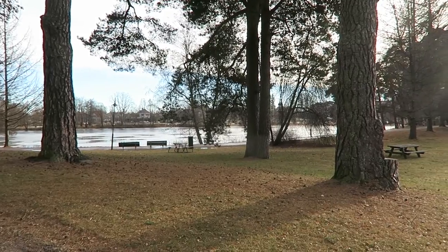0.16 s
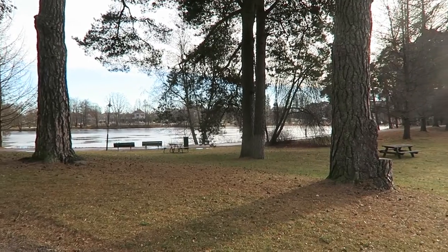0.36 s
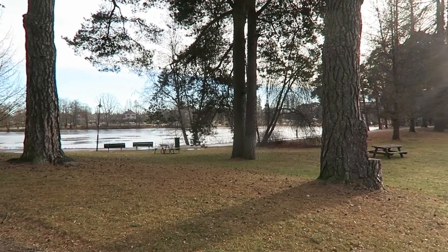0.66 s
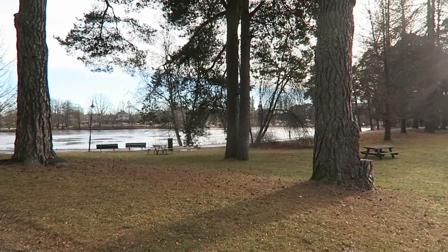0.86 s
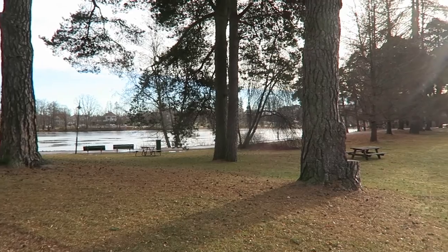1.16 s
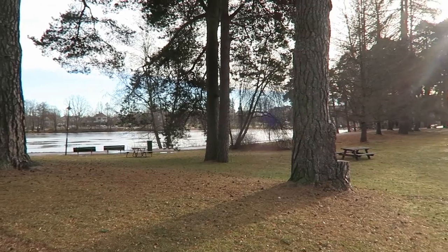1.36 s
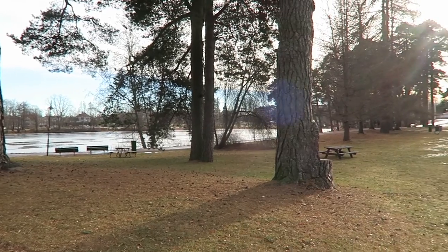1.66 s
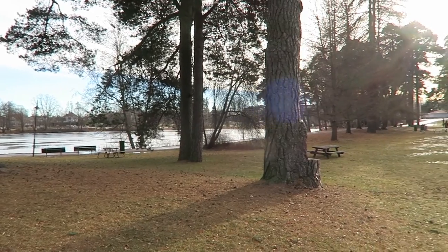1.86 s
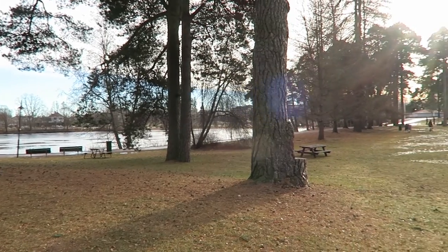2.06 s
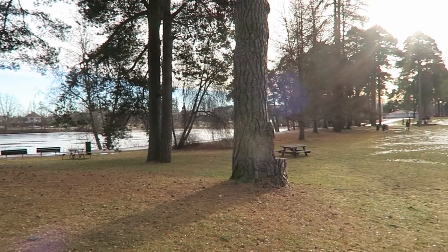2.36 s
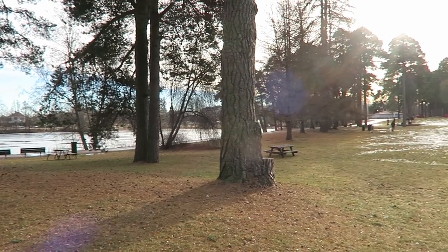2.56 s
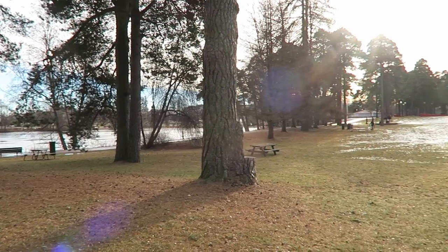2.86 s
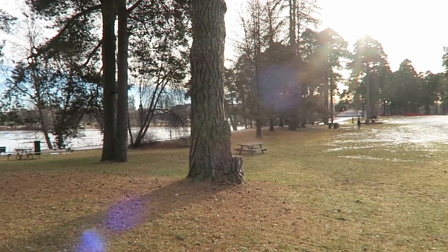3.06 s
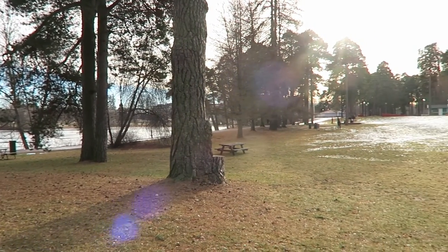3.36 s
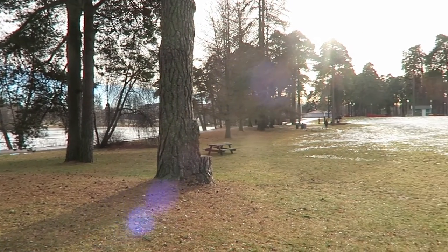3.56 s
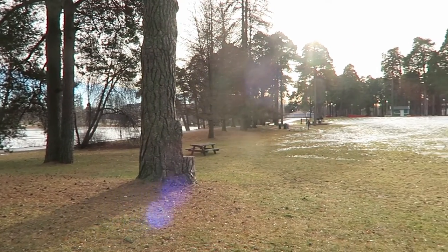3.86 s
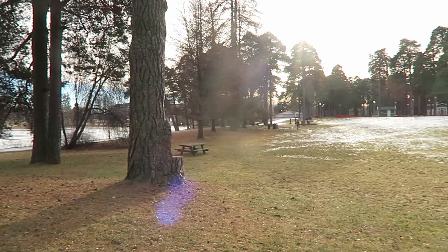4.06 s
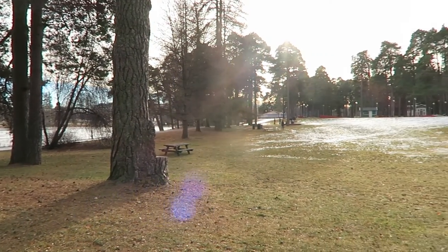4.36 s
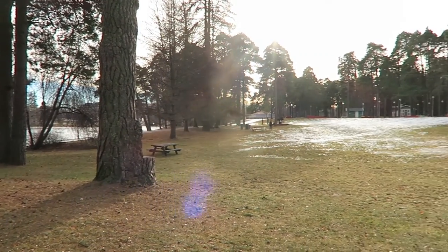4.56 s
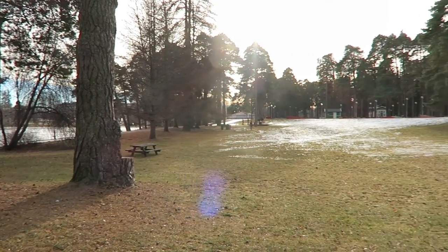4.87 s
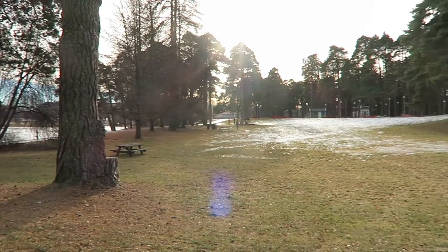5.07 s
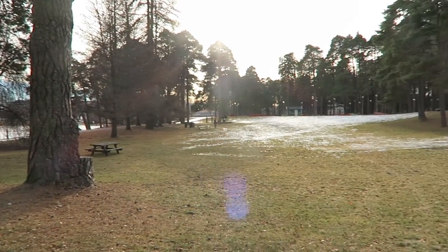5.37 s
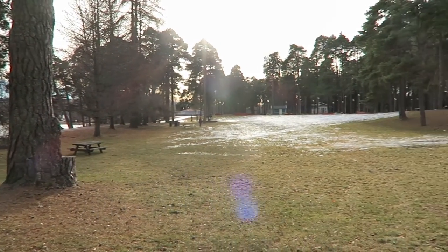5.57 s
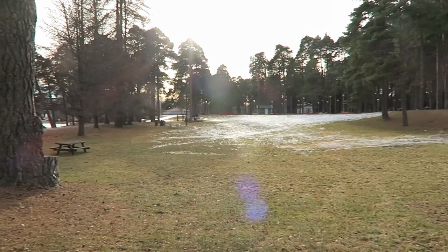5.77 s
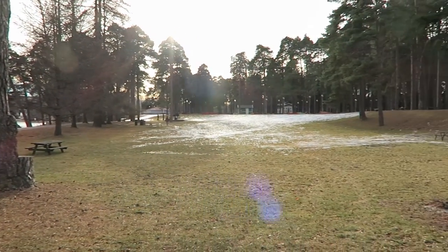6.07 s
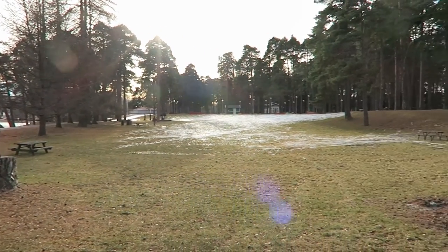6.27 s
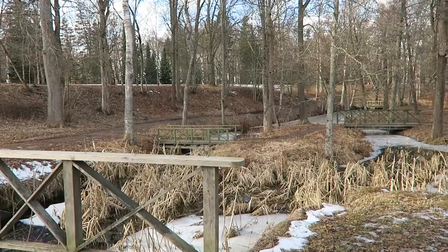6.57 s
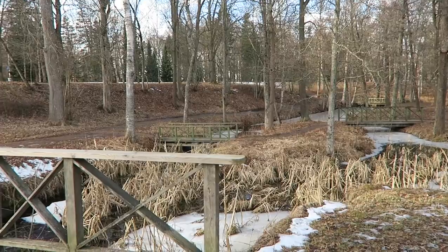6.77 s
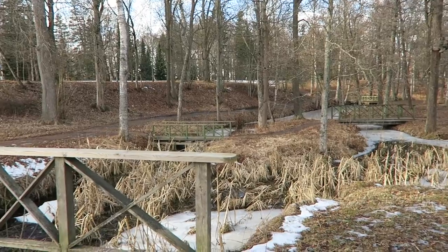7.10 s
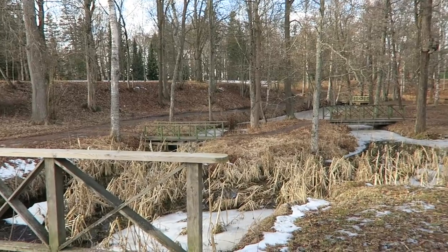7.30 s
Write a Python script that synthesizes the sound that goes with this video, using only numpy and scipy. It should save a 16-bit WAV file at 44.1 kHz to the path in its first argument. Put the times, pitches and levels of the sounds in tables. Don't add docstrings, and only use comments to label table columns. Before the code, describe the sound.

Steady distant road roar with swelling low rumble, faint birdsong and tiny clicks, then an abrupt cut to a rushing brook hit by buffeting wind.

```python
import sys
import numpy as np
from scipy import signal
from scipy.fft import rfft, irfft, next_fast_len
from scipy.io import wavfile
from scipy.ndimage import uniform_filter1d

SR = 44100
rng = np.random.default_rng(int(sys.argv[2]) if len(sys.argv) > 2 else 0)


def ratio(d):
    e = np.asarray(d, float) / 20
    return 10 ** e


def inscribe(sig):
    pcm = np.round(np.clip(np.atleast_2d(sig).T, -1, 1) * 32767)
    wavfile.write(sys.argv[1], SR, pcm.astype(np.int16))


N = 327944
CHANGE_S, WIND_FILTER_S = 6.632, 7.252


def curves(table):
    s, *columns = np.transpose(table)
    return [np.interp(np.arange(N) / SR, s, c) for c in columns]


def after(seconds, fade_s=0.0033):
    return np.clip((np.arange(N) / SR - seconds) / fade_s, 0, 1)


def walk(rate_hz):
    k = int(SR / rate_hz)
    held = np.repeat(rng.standard_normal(N // k + 1), k)
    return 1.3 * uniform_filter1d(uniform_filter1d(held, k), k)[:N]


def bumps(table):
    t = np.arange(N) / SR
    return sum(ratio(db) * np.exp(-((t - s) / length) ** 2 * 4) for s, length, db in table)


def band(x, lo_hz, hi_hz, order=2):
    return signal.sosfilt(signal.butter(order, [lo_hz, hi_hz], "bandpass", fs=SR, output="sos"), x)


def even(x, seconds):
    k = int(seconds * SR)
    return x / np.sqrt(uniform_filter1d(uniform_filter1d(x ** 2, k), k) + 1e-12)


def ports(mid, side):
    return np.array([mid + side, mid - side])


def along(table, hz):
    table_hz, value = np.transpose(table)
    return np.interp(np.log(hz), np.log(table_hz), value)


def wash(mid_spectrum, side_spectrum, lean, lo_hz, hi_hz):
    size = next_fast_len(N)
    hz = np.arange(size // 2 + 1) * SR / size + 1e-3
    mid, own = rfft(rng.standard_normal((2, size)))
    share = np.clip(along(lean, hz), -.95, .95)
    bins = np.array([mid, 1j * share * mid + np.sqrt(1 - share ** 2) * own])
    bins *= ratio([along(mid_spectrum, hz), along(side_spectrum, hz)])
    inside = (hz > lo_hz) & (hz < hi_hz)
    power = 2 * np.sum(np.abs(bins[:, inside]) ** 2, axis=1, keepdims=True)
    return irfft(bins, size)[:, :N] * size / np.sqrt(power)


def treble_flicker(x):
    out = x.copy()
    for lo_hz, hi_hz in [(3000, 4500), (4500, 6500), (6500, 8500), (8500, 11000), (11000, 14500)]:
        out += band(x, lo_hz, hi_hz) * (ratio(1.6 * walk(24)) - 1)
    return out


# time in seconds, level in dB.
RUMBLE = [(0.0, -41), (.15, -33.5), (.45, -38.5), (.8, -32.5), (1.0, -36), (1.45, -32), (1.75, -35.5),
          (2.4, -33.5), (2.6, -34), (3.1, -36.5), (3.45, -30), (3.7, -35), (4.1, -34), (4.9, -36),
          (5.5, -32.5), (5.7, -32.5), (6.25, -35), (6.62, -32)]
# frequency in Hz, density in dB per Hz.
ROAD_MID = [(12, -56), (20, -19), (32, -10.5), (47, 1.5), (60, 0), (198, -10), (227, -12.5), (384, -19.5),
            (615, -18), (767, -16), (1040, -17), (1300, -24), (2730, -44), (11800, -69), (14700, -76)]
ROAD_SIDE = [(35, -49), (60, -26), (81, -15), (154, -5), (274, -3), (362, -4), (425, -2.5), (466, -5),
             (1090, -10), (5870, -35), (8100, -36.5), (14700, -51)]
# frequency in Hz, share of side following mid (-1..1).
ROAD_LEAN = [(200, -0.13), (520, -0.47), (2200, -.2), (3300, 0.27), (4200, 0.9), (5500, .3), (8000, .05)]


def road():
    roar_db, side_db, rumble_top_hz = -38.5, -50.5, 152
    rumble_db = curves(RUMBLE)[0] + 1.37 * walk(11)
    mid, side = wash(ROAD_MID, ROAD_SIDE, ROAD_LEAN, 400, 1600)
    rumble = signal.sosfiltfilt(signal.butter(2, rumble_top_hz, fs=SR, output="sos"), mid)
    roar = (mid - rumble) * ratio(roar_db + .5 * walk(12))
    mid = even(rumble, 0.29) * ratio(rumble_db) + roar
    return treble_flicker(ports(mid, side * ratio(side_db)))


# time in seconds, peak in dB.
PUFFS = [(.37, -44), (.7, -37), (.87, -46), (1.09, -53), (1.35, -37), (1.5, -42), (1.66, -44), (1.8, -51),
         (1.95, -53), (2.38, -37), (2.6, -55), (2.75, -51), (2.89, -54), (3.31, -45), (3.45, -41),
         (3.58, -48), (5.15, -48), (5.49, -37), (5.83, -38), (5.97, -42), (6.08, -37), (6.34, -41),
         (6.53, -37), (6.62, -38)]


def breeze():
    rise_db_s, fall_db_s, flutter_db = 196, 174, -6.5
    t = np.arange(N) / SR
    puffs_db = [db - np.maximum(rise_db_s * (s - t), fall_db_s * (t - s)) for s, db in PUFFS]
    throb_db = np.max(puffs_db, axis=0)
    throb = even(band(rng.standard_normal(N), 58, 97, order=3), 0.065)
    flutter = even(band(rng.standard_normal(N), 116, 190), 0.063)
    gate = np.clip((throb_db + 78) / 6, 0, 1)
    return ports(0, gate * ratio(throb_db) * (throb + ratio(flutter_db + 4.0 * walk(10)) * flutter))


def glides(table, bend, late):
    out = np.zeros((2, N))
    for s, length, start_hz, end_hz, db, lead_rad in table:
        u = np.arange(int(length * SR)) / (length * SR)
        hz = end_hz + (start_hz - end_hz) * (1 - u) ** bend
        phase = 2 * np.pi * np.cumsum(hz) / SR
        shape = 2 * ratio(db) * np.sin(np.pi * u ** late) ** .6
        out[:, int(s * SR):][:, :len(u)] += shape * np.sin([phase + lead_rad / 2, phase - lead_rad / 2])
    return out


def chatter():
    notes_per_s, lo_hz, hi_hz, top_db = 14, 1800, 4700, -69
    when, pitch, length, glide, force = rng.random((int(notes_per_s * CHANGE_S), 5)).T
    hz = lo_hz * (hi_hz / lo_hz) ** pitch
    db = top_db - 9 * pitch - 6 * force
    rows = zip(when * CHANGE_S, .02 + .06 * length, hz, hz * (.96 + .08 * glide), db, glide)
    return glides(rows, bend=1.1, late=1.1) * ratio(3 * walk(100))


# seconds before the strong stroke, length in seconds, start in Hz,
# end in Hz, level in dB relative to it.
OPENING_LEAD = [(.026, .022, 5250, 6050, -6.5), (.016, .012, 4450, 6300, -3.5),
                (.005, .012, 5800, 6500, -11)]
CLOSING_LEAD = [(.031, .014, 4750, 5600, -6), (.013, .012, 4700, 6600, -3.5), (.02, .012, 5500, 6200, -10)]
SINGLE_LEAD = [(.012, .022, 3980, 7300, -7.5)]
# strong stroke in seconds, length in seconds, start in Hz, rms in dB,
# held end in dB relative to it.
OPENING_CALLS = [
    (1.172, .023, 4350, -59, -12),
    (2.638, .024, 3900, -61, -21),
]
CLOSING_CALLS = [
    (1.328, .019, 4240, -58, -18),
    (2.776, .024, 4300, -60.5, -19),
]
SINGLE_CALLS = [
    (3.255, .034, 4000, -63, -20),
]


def finch():
    stroke_lead_rad, lead_in_lead_rad, overtone_lead_rad = 1, 1.6, 3.4
    hold_s, hold_hz = 0.085, 5480
    leads, strokes, extras = [], [], []
    phrases = [(OPENING_CALLS, OPENING_LEAD), (CLOSING_CALLS, CLOSING_LEAD), (SINGLE_CALLS, SINGLE_LEAD)]
    for calls, lead_in in phrases:
        for s, length, start_hz, db, hold_db in calls:
            for before, d, a_hz, b_hz, under_db in lead_in:
                leads.append((s - before, d, a_hz, b_hz, db + under_db, lead_in_lead_rad))
            end_hz = 5290 + 13400 * length
            strokes.append((s, length, start_hz, end_hz, db, stroke_lead_rad))
            extras.append((s, length, 7100, 7600, db - 3, overtone_lead_rad))
            extras.append((s + length + .012, hold_s, hold_hz, hold_hz, db + hold_db, stroke_lead_rad))
    return leads, strokes, extras


# start in seconds, length in seconds, start in Hz,
# end in Hz, rms in dB.
WHISTLES = [(.229, .008, 7400, 8500, -80), (0.232, .018, 8700, 7740, -57.5), (.268, .014, 7900, 8400, -71),
            (.28, 0.02, 8400, 8140, -69), (1.817, 0.072, 9100, 8600, -63), (2.378, .039, 8700, 9300, -70),
            (3.364, 0.062, 8700, 8260, -66), (3.434, .15, 8600, 7900, -71), (3.475, .092, 8640, 8000, -76),
            (4.157, .19, 8550, 7800, -74), (5.116, 0.081, 9000, 8500, -70), (6.08, .04, 8200, 7900, -76),
            (6.254, 0.082, 8850, 8200, -73), (6.346, .094, 8230, 7870, -64.5)]
TWITTER = [(2.245, 0.049, 3330, 3260, -69), (2.004, 0.043, 3200, 3320, -77), (2.115, .05, 3200, 3300, -70),
           (2.306, .04, 3250, 3280, -70), (2.37, .03, 3480, 3500, -77), (4.687, .098, 3950, 4060, -75),
           (5.095, .025, 4120, 4200, -70), (5.2, 0.14, 4050, 4200, -78), (5.33, .04, 3300, 3270, -74),
           (5.42, .19, 4190, 4100, -80), (5.59, .03, 6330, 6200, -74), (5.69, .025, 5250, 5000, -73),
           (5.95, .03, 5100, 4800, -75), (6.1, .05, 4150, 4050, -74), (6.22, 0.055, 3250, 3420, -72)]
# start in seconds, length in seconds, pitch in Hz, rms in dB.
PIPING = [(1.025, .03, 2620, -67), (1.075, .03, 2640, -63), (1.155, .06, 2635, -61),
          (1.24, .035, 2630, -66), (1.295, .021, 2640, -63), (1.76, .02, 2660, -65),
          (1.838, .038, 2680, -61), (1.88, .035, 2690, -61), (1.982, .035, 2690, -62),
          (2.04, .03, 2680, -67), (2.09, .08, 2670, -69), (2.2, .024, 2670, -68), (1.0, .36, 2635, -68),
          (1.83, .6, 2680, -72), (2.37, .03, 2690, -67)]


def birds():
    whistle_lead_rad, twitter_lead_rad, piping_lead_rad = 1.98, .6, .2
    trees_t60_s, chirp_tail_db, whistle_tail_db = 0.64, -2.5, -9
    leads, strokes, extras = finch()
    thin = [(*row, whistle_lead_rad) for row in WHISTLES]
    thin += [(*row, twitter_lead_rad) for row in TWITTER]
    thin += [(s, length, hz, hz, db, piping_lead_rad) for s, length, hz, db in PIPING]
    chirps = glides(strokes, bend=2.4, late=1.6) * ratio(3.5 * walk(400))
    chirps += glides(leads, bend=1.3, late=1.2) * ratio(5.5 * walk(600) - 2)
    whistles = glides(thin, bend=1.1, late=1.2) * ratio(3 * walk(120) + .7 * walk(40))
    overtones = glides(extras, bend=1.2, late=0.74) * ratio(2.3 * walk(97))
    t = np.arange(SR // 2) / SR
    scatter = rng.standard_normal((2, len(t))) * ratio(-60 * t / trees_t60_s) * (t > .008)
    scatter /= np.sqrt(np.sum(scatter ** 2, axis=1, keepdims=True))
    sent = chirps * ratio(chirp_tail_db) + whistles * ratio(whistle_tail_db)
    tail = signal.fftconvolve(sent, scatter, axes=1)[:, :N]
    return chirps + whistles + overtones + tail


# frequency in Hz, t60 in seconds, level in dB.
TICK_MODES = [(5300, .011, -2), (5800, .011, 0), (4150, .022, -7.5), (3300, .02, -8), (7900, .005, -16)]
# first frame, last frame, frames per step, peak in dB.
LENS_RUNS = [(0, 14, 2, -58.5), (6, 6, 1, -53), (17, 21, 4, -56), (23, 24, 1, -63), (25, 29, 2, -57),
             (136, 136, 1, -51.5), (137, 137, 1, -59), (143, 153, 2, -60.5), (154, 166, 4, -59),
             (155, 157, 2, -56), (160, 165, 1, -57.5), (170, 170, 1, -54), (172, 176, 2, -61),
             (179, 183, 2, -60)]
# first frame, last frame, frames between, delay in seconds, peak in dB.
KICKS = [(0, 12, 4, .0188, -60), (25, 28, 3, .017, -59), (137, 161, 6, .018, -58), (157, 160, 3, .007, -59),
         (163, 165, 1, .006, -59), (170, 182, 12, .026, -58), (174, 174, 1, .0165, -56),
         (183, 183, 1, .026, -53)]


def lens():
    frame_s, first_frame_s = 1001 / 30000, .0705
    creep_from_s, creep_every_s, creep_db = 1.766, .0822, -60
    runs = [(first, last, every, 0, db) for first, last, every, db in LENS_RUNS] + KICKS
    ticks = [(creep_from_s + k * creep_every_s, creep_db) for k in range(5)]
    for first, last, every, late_s, db in runs:
        ticks += [(first_frame_s + k * frame_s + late_s, db) for k in range(first, last + 1, every)]
    s, db = np.transpose(ticks)
    steps = np.zeros(N)
    steps[(s * SR).astype(int)] = ratio(db + 1.2 * rng.standard_normal(len(s)))
    t = np.arange(SR // 50) / SR
    ring = sum(ratio(g - 60 * t / t60) * np.sin(2 * np.pi * hz * t) for hz, t60, g in TICK_MODES)
    tick = signal.fftconvolve(steps, ring * np.minimum(t / 0.002, 1))[:N]
    return ports(tick * ratio(7.0), tick * ratio(-4))


def brook_db():
    return -35.5 - 9.6 * after(6.99, 7.095 - 6.99) + 2.0 * after(7.22, 7.32 - 7.22)


def bubbles():
    per_s, lo_hz, hi_hz, cycles, rise, scatter_db = 800, 1100, 3800, 26, .06, 2.5
    brook_s = N / SR - CHANGE_S
    chance = rng.random((int(per_s * brook_s), 4))
    out, t = np.zeros((2, N + SR // 20)), np.arange(SR // 20) / SR
    for when, size, force, pan in chance:
        hz = lo_hz * (hi_hz / lo_hz) ** size
        u = t * hz / cycles
        ring = u * np.exp(-3 * u) * np.sin(2 * np.pi * hz * t * (1 + rise * u))
        gain = ratio(-scatter_db * np.log(force + 1e-3) - 6 * size)
        start = int((CHANGE_S + when * brook_s) * SR)
        out[:, start:][:, :len(t)] += gain * ring * np.array([[.7 + .6 * pan], [1.3 - .6 * pan]])
    return out[:, :N] / np.sqrt(np.mean(out[:, int(CHANGE_S * SR):N] ** 2))


# frequency in Hz, density in dB per Hz.
BROOK_MID = [(60, -33), (100, -5.5), (200, -7), (330, -10), (450, -11), (650, -15), (1040, -17),
             (2000, -26), (3700, -30.5), (4200, -36), (4500, -36), (7500, -46.5), (8000, -53.5),
             (8500, -58.5), (14700, -92)]
BROOK_SIDE = [(290, -35), (500, -5), (683, -15), (733, -14), (1370, -14), (2150, -19.5), (3430, -19.5),
              (6580, -28.5), (7800, -30), (8800, -34), (11800, -37.5), (14700, -58)]
# frequency in Hz, share of side following mid (-1..1).
BROOK_LEAN = [(600, .4), (2400, .6), (4300, .7), (6100, .5), (9000, .1)]
# time in seconds, length in seconds, level in dB.
SPRAY = [
    (6.655, 0.045, -74),
    (6.695, .03, -74),
    (6.735, 0.04, -74),
    (6.845, .015, -68),
    (6.861, 0.007, -56),
    (6.88, .03, -73),
    (6.991, 0.0096, -65),
    (7.149, .02, -78),
]
# time in seconds, length in seconds, dB over the rush.
SLAPS = [
    (6.65, .008, 2.5),
    (6.715, 0.011, 3.5),
    (6.74, .012, 3.5),
    (6.806, .01, 2),
    (6.858, .01, 2),
    (6.936, .012, 1),
    (6.975, .012, 2.5),
    (7.06, .007, 7),
]


def brook():
    t = np.arange(N) / SR
    level = ratio(brook_db() + 0.75 * walk(130))
    mist = ratio(-15) * band(rng.standard_normal((2, N)), 13100, 14500, order=4)
    bright = band(rng.standard_normal((2, N)), 9600, 12100, order=4) + mist
    mid, side = wash(BROOK_MID, BROOK_SIDE, BROOK_LEAN, 900, 6000)
    patchy = mid + band(mid, 1400, 2600) * (ratio(1.8 * walk(120)) - 1)
    patchy += band(mid, 2400, 4400) * (ratio(1.8 * walk(150) + 0.1) - 1)
    slap_db = sum(db * np.exp(-((t - s) / length) ** 2) for s, length, db in SLAPS)
    patchy = patchy + band(patchy, 2000, 3800) * (ratio(slap_db) - 1)
    rush = ports(patchy, side * ratio(-8)) * ratio(-2)
    spray = 3 * bumps(SPRAY) * ports(bright[0], bright[1] * ratio(-4))
    return level * (rush + ratio(-9) * bubbles()) + spray


# frequency in Hz, density in dB per Hz.
CALM_MID = [(18, -56), (30, -9), (180, -4.5), (251, -8), (326, -2.5), (362, -6), (1050, -7.5), (1190, -4),
            (1670, -13.5), (2530, -14.5), (5500, -29.5), (9240, -51.5), (14700, -60)]
CALM_SIDE = [(700, -22), (1200, -9), (2000, -5), (4000, -4), (8000, -10), (14700, -27)]


def calm_brook():
    mid, side = wash(CALM_MID, CALM_SIDE, BROOK_LEAN, 900, 6000)
    return ratio(brook_db()) * ports(mid, side * ratio(-14.5))


def eddies(rate_hz, jitter, size_db, lag_s):
    chance = rng.standard_normal((int(rate_hz * N / SR), 4))
    s = np.cumsum(np.exp(jitter * chance[:, 0])) / rate_hz
    out = np.zeros((2, N))
    for port, lag in enumerate([lag_s, -lag_s]):
        at = ((s + lag * chance[:, 1]) * SR).astype(int)
        np.add.at(out[port], at[at < N], -ratio(size_db * chance[:, 2 + port])[at < N])
    return out


# time at left port in seconds, left in dB, right in dB, width in ms.
SUCKS = [(6.9007, -8, -5, 1.5), (6.9055, -12, -20, 1.8), (6.9226, -15, -19, 1.8), (6.9365, -12, -13, 2.2),
         (6.9506, -6, -8, 1.3), (6.9662, -8, -5, 2.0), (6.9783, -12, -20, 2.0), (6.9862, -6, -3, 1.6),
         (6.9976, -5, -6, 1.15), (7.0002, -9, -6, .95), (7.0144, -10, -13, 1.4), (7.0236, -10, -8, 1.7),
         (7.0329, -11, -12, 1.3), (7.0402, -3.5, -4, 1.5), (7.0489, -9, -9, 1.1), (7.0535, -14, -15, 1.0),
         (7.0605, -8, -6, 1.4), (7.0667, -10, -10, 1.1), (7.0706, -13, -20, 1.2), (7.0761, -3, -7, .95),
         (7.079, -24, -8, 1.0), (7.0856, -13, -10, 1.6), (7.0961, -4, -7, 1.3), (7.1027, -6, -10, 1.2),
         (7.1138, -14, -14, 1.2), (7.1189, -8, -9, 1.4), (7.126, -10, -14, 1.3), (7.1365, -15, -17, 1.7),
         (7.1624, -11, -12, 1.4), (7.2219, -14, -12, 1.5), (7.2348, -14, -19, 1.4), (7.2455, -15, -14, 1.5)]
SUCK_SHARP = [
    [1.3],
    [.9],
]


def sucks():
    lag_s, vent_hz = .0017, 58
    t = np.arange(N) / SR
    out = np.zeros((2, N))
    for s, left_db, right_db, ms in SUCKS:
        near = slice(int((s - .01) * SR), int((s + .012) * SR))
        late_s = t[near] - s - np.array([[0], [lag_s]])
        pulse = np.exp(-np.array(SUCK_SHARP) * (late_s * 1000 / ms) ** 2)
        out[:, near] -= ratio([[left_db + 2.5], [right_db + 2.5]]) * pulse
    return signal.sosfiltfilt(signal.butter(2, vent_hz, "highpass", fs=SR, output="sos"), out)


# time in seconds, wind pressure in dB, crosswind (side minus mid) in dB.
GUST = [
    (6.63, -36, -10),
    (6.87, -32.5, -13),
    (6.9, -16, 1),
    (6.925, -25, 2),
    (6.985, -9, -1),
    (7.02, -16, 6),
    (7.105, -19.5, 8),
    (7.19, -21.5, -4),
    (7.23, -21, 4),
]
# time in seconds, length in seconds, peak in dB.
HEAVES = [
    (6.643, .05, -22),
    (6.708, 0.083, -15.5),
]


def gust():
    wind_db, cross_db = curves(GUST)
    wind_db = wind_db - 14 * after(6.89)
    left, right = eddies(rate_hz=78, jitter=.25, size_db=6.5, lag_s=0.0031)
    buffet_mid = even(band(band(left + right, 110, 220), 80, 400), .03)
    buffet_side = even(band(band(left - right, 95, 250), 75, 430), .03)
    thump_mid = even(band(left + right, 58, 118), .04)
    rasp = even(band(left + right, 251, 379), 0.038)
    heave = rng.standard_normal(N)
    swell = bumps(HEAVES)
    slow, quick = even(band(heave, 25, 45), .04), even(band(heave, 55, 95), .04)
    mid = ratio(wind_db) * (thump_mid * ratio(2.5 + walk(9.8)) + buffet_mid * ratio(-4 + 2.0 * walk(25)))
    mid += ratio(wind_db - 14 + 7.5) * rasp
    mid += ratio(-9.5) * swell * even(band(heave, 34, 65), 0.044)
    side = ratio(wind_db + cross_db + 7.0) * (quick * ratio(-5) + buffet_side * ratio(1.5 * walk(25)))
    both = ports(mid, side + slow * swell) + sucks()
    return 1.5 * np.tanh(both / 1.5)


def scene():
    change, calm = after(CHANGE_S), after(WIND_FILTER_S)
    park = road() + breeze() + chatter() + birds() + lens()
    water = (brook() + gust()) * (1 - calm) + calm_brook() * calm
    return park * (1 - change) + water * change


def low_pass(x):
    return signal.sosfilt(signal.butter(12, 14890, fs=SR, output="sos"), x)


def record(dry):
    return low_pass(dry)


dry = scene()
out = record(dry)
inscribe(out)
```